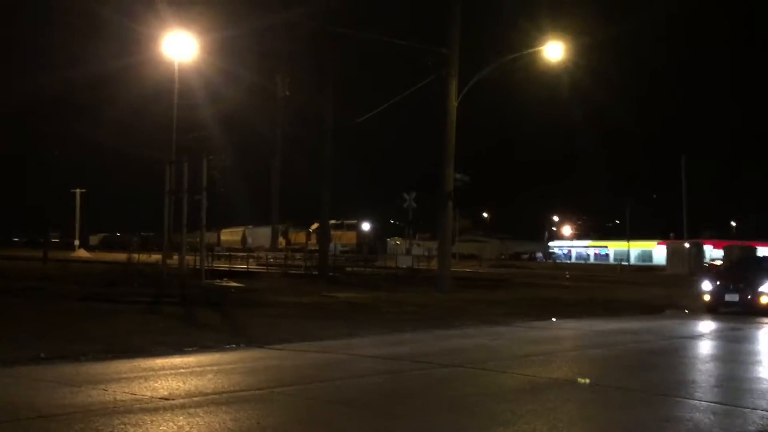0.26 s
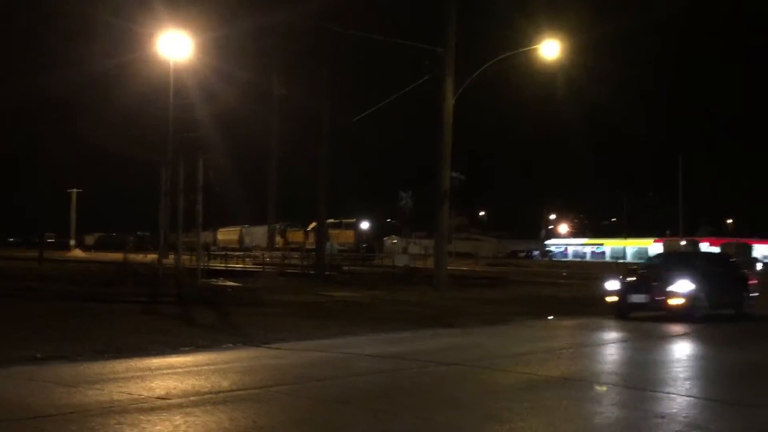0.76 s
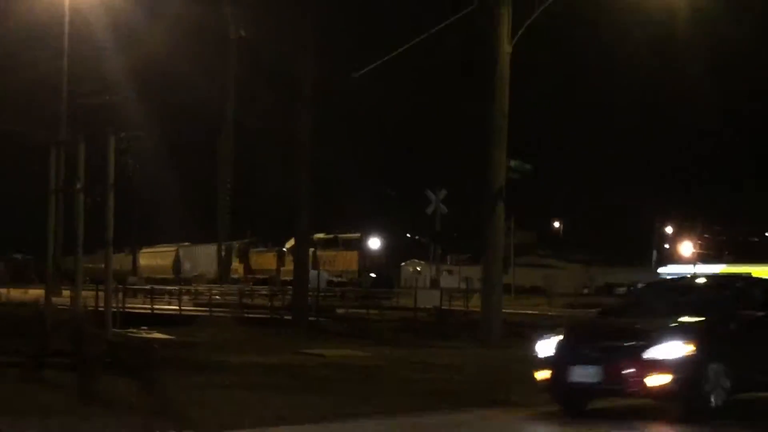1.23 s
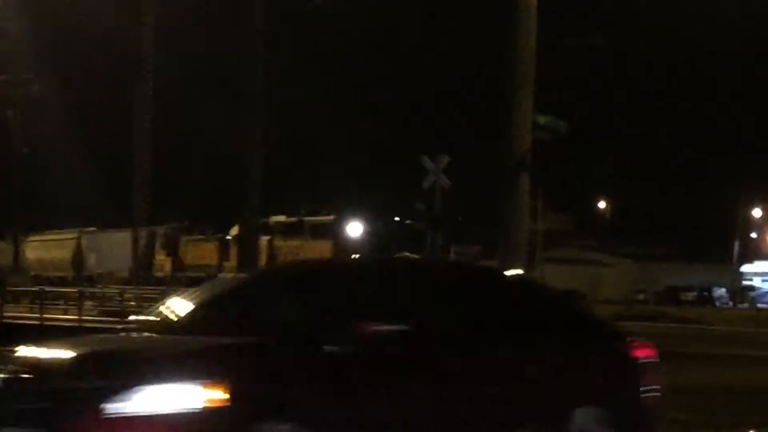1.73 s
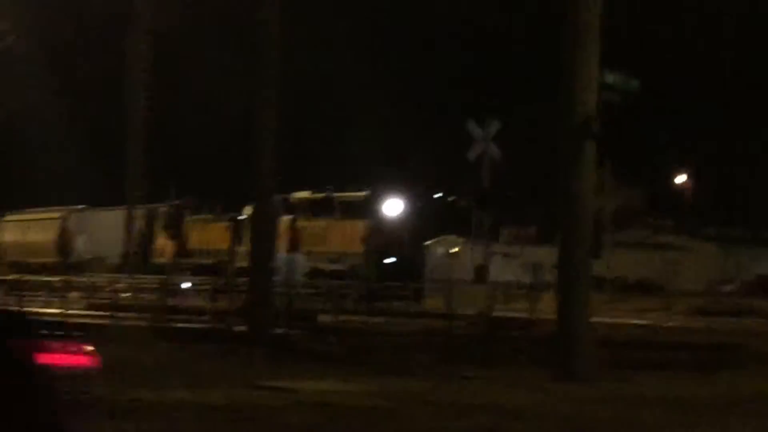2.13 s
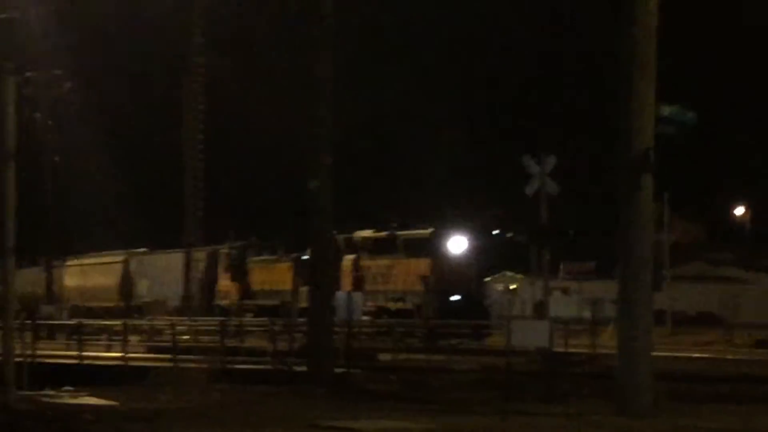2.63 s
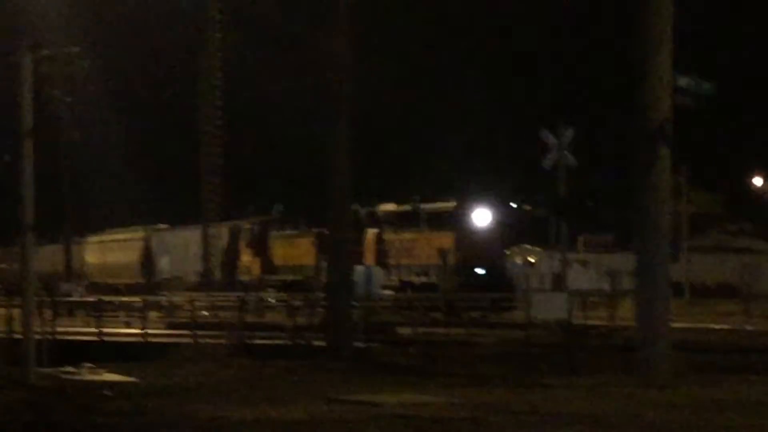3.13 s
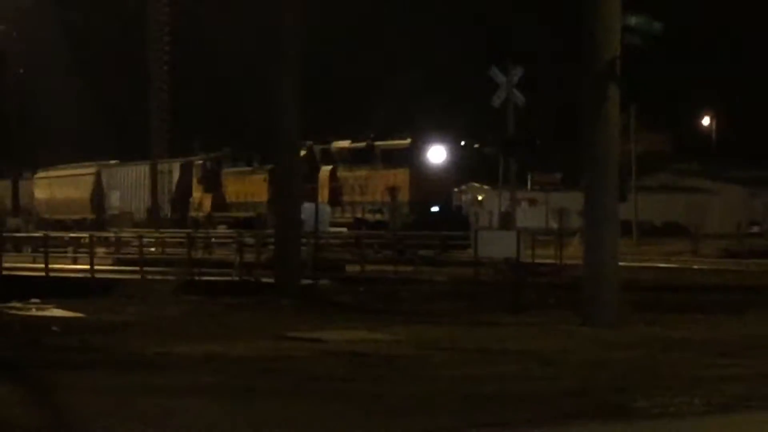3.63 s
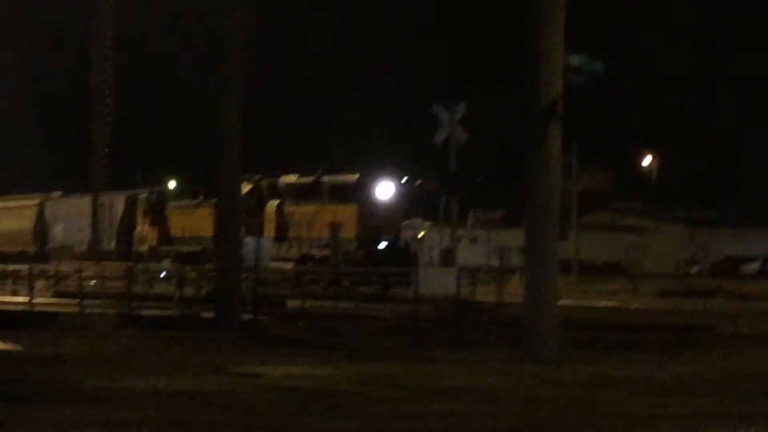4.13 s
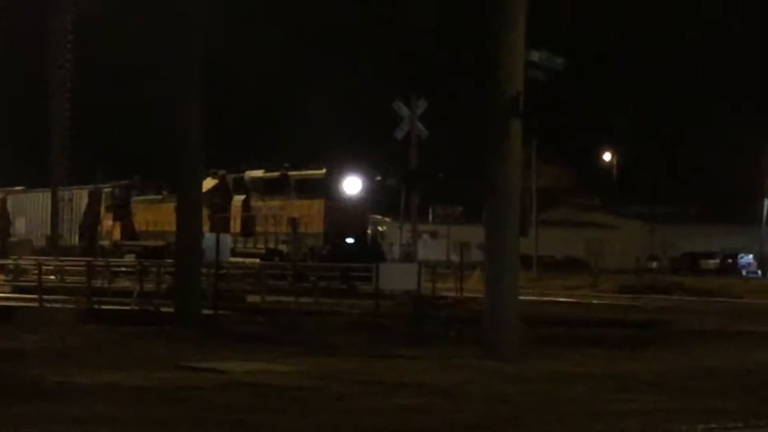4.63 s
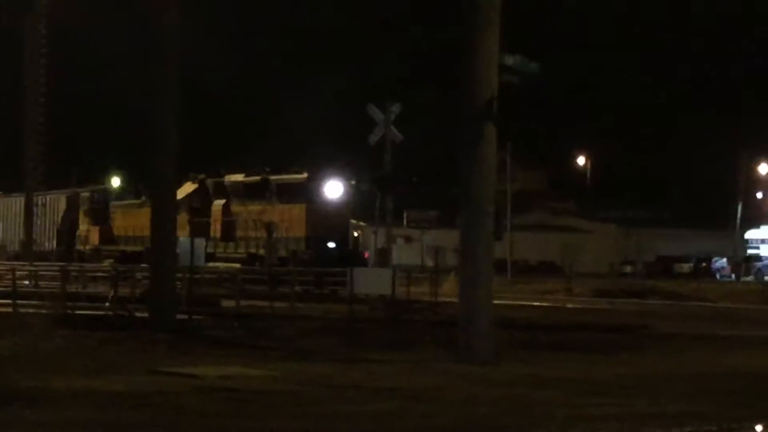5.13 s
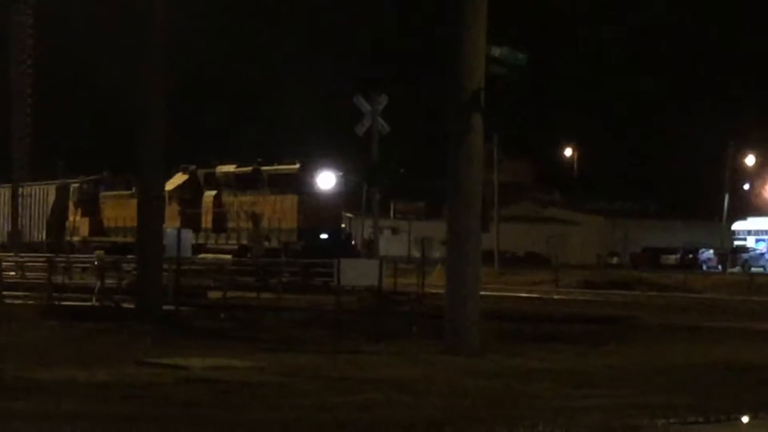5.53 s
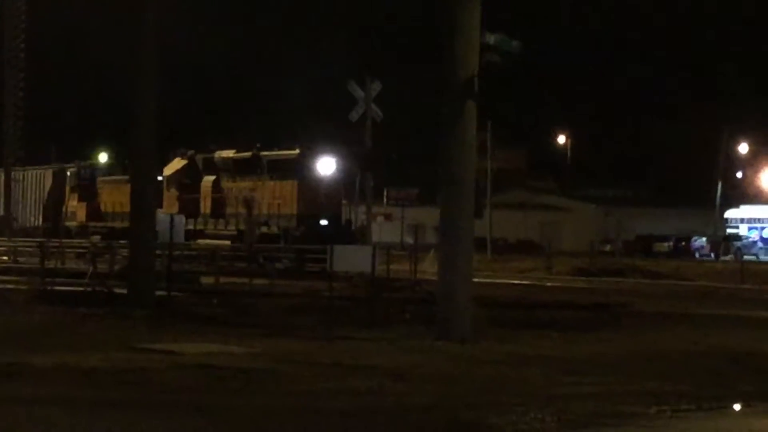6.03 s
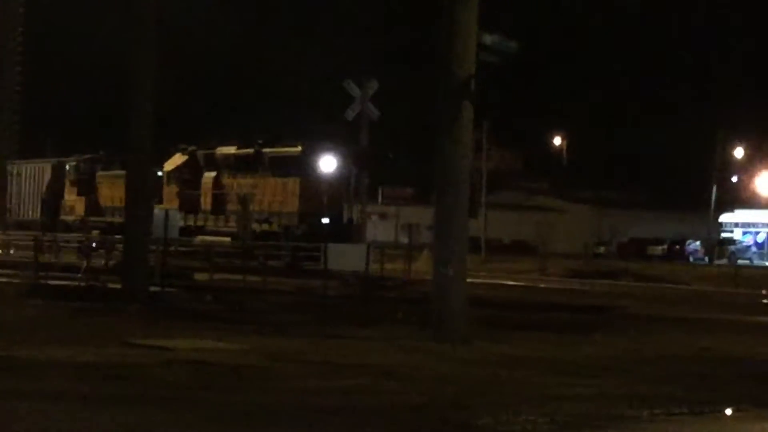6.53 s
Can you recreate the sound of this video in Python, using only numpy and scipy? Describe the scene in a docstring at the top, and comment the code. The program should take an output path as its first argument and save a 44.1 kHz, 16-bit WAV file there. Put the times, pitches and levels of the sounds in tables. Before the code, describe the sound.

A distant diesel locomotive chugs and revs up as a car passes close on a wet road, its tyres knocking over rails.

```python
"""A diesel locomotive throbs across a yard at night and revs up: uneven cylinders chug through the
exhaust stack over rumble and fan roar, while the turbocharger's blades whistle higher and higher.
A car passes close on a wet road. Its tread roars, throws spray and ticks with grit, then the tyres
knock over the rails of the crossing. The car recedes and the engine eases off under a faint hum."""
import sys
import numpy as np
from scipy import signal
from scipy.fft import rfft, irfft, next_fast_len
from scipy.io import wavfile
from scipy.ndimage import uniform_filter1d, map_coordinates

SR = 44100
rng = np.random.default_rng(int(sys.argv[2]) if len(sys.argv) > 2 else 0)


def int16_out(signal):
    """Quantize to a 16-bit WAV file."""
    q = np.round(np.clip(np.atleast_2d(signal).T, -1, 1) * 32767)
    wavfile.write(sys.argv[1], SR, q.astype(np.int16))


N = 298116
TIME = np.arange(N) / SR


def amp(db):
    """Gain of a level in dB."""
    return 10 ** (np.asarray(db) / 20)


def unit(x):
    """x at rms 1."""
    return x / np.sqrt(np.mean(np.abs(x) ** 2) + 1e-20)


def curves(rows):
    """Breakpoints to envelopes: one for each column after the time."""
    times, *columns = np.transpose(rows)
    return [np.interp(TIME, times, column) for column in columns]


def wobble(rate):
    """A smooth random curve, rate knots a second."""
    coarse = TIME[::32]
    knots = rng.standard_normal(int(N * rate / SR) + 4)
    return np.interp(TIME, coarse, map_coordinates(knots, [coarse * rate]))


def filtered(x, response):
    """x through an EQ given as gain against frequency."""
    size = next_fast_len(N + 8192)
    return irfft(rfft(x, size) * response(np.fft.rfftfreq(size, 1 / SR)), size)[..., :N]


def rush(spectrum, patchy_db, source=None, patch=(5, 10)):
    """Coloured noise of rms 1 with random gain in patches of (bins, frames)."""
    cells = signal.stft(rng.standard_normal(N) if source is None else source, nperseg=512)[2]
    field = uniform_filter1d(rng.standard_normal(cells.shape), patch[0], 0)
    field = uniform_filter1d(field, patch[1], 1)
    mottled = signal.istft(cells * amp(patchy_db * unit(field)), nperseg=512)[1][:N]
    eq_hz, eq_db = np.transpose(spectrum)
    return unit(filtered(mottled, lambda hz: amp(np.interp(np.log(hz + 1), np.log(eq_hz), eq_db))))


def fuzzy_tone(hz, width_hz, steady=0, order=2):
    """A band of noise around a held or gliding pitch, plus a steady share of pure tone; rms 1."""
    drift = filtered(rng.standard_normal((2, N)), lambda f: 1 / (1 + (2 * f / width_hz) ** order))
    envelope = steady + unit(drift[0] + 1j * drift[1])
    phase = 2 * np.pi * np.cumsum(np.broadcast_to(hz, N)) / SR
    return unit(np.real(envelope * np.exp(1j * phase)))


def band_burst(count, hz, half_width_hz):
    """A short noise of rms 1 in a band around hz."""
    f = np.fft.rfftfreq(count, 1 / SR)
    return unit(irfft(rfft(rng.standard_normal(count)) / (1 + ((f - hz) / half_width_hz) ** 4), count))


def hum():
    """A faint falling hum creeps in at the end."""
    # the hum's glide: time_s, pitch_hz, level_db
    glide = [(6.4, 583, -79), (6.55, 575, -50), (6.76, 561, -54)]
    hz, level_db = curves([(0, 680, -120)] + glide)
    return amp(level_db) * fuzzy_tone(hz, width_hz=8.1, steady=.9)


def drone():
    """A low, wavering note beside the exhaust that drops back as the car leaves."""
    # the note's course: time_s, pitch_hz, level_db
    course = [(0, 166, -41.5), (.3, 166, -39.5), (.6, 163, -50), (1.3, 162, -45.5), (1.9, 160, -51),
              (2.4, 158, -44.5), (2.95, 162, -45), (3.3, 160, -51), (3.7, 160, -60.5), (6.76, 165, -59.5)]
    hz, level_db = curves(course)
    return amp(level_db) * fuzzy_tone(hz, width_hz=20, steady=.4)


def rumble_and_fans():
    """Low rumble of engine and wagons, and the broad roar of fans and intake."""
    # faders of the two beds: time_s, rumble_db, fan_db
    levels = [(0, -41.5, -46), (1, -37.5, -41.5), (2, -38.5, -51), (2.9, -36.5, -39.5), (3.5, -39, -38),
              (4, -38.5, -39.5), (4.5, -38.5, -39), (5, -38.5, -38.5), (5.5, -40, -39.5), (6.76, -39, -41)]
    # colour of the rumble: frequency_hz, relative_db
    rumble_eq = [(20, -34), (30, -37), (50, 2.5), (70, -2.5), (90, -4.5), (120, -6), (145, -5), (170, -5.5),
                 (200, -6.5), (280, -12), (400, -19), (800, -72.5)]
    # colour of the fans: frequency_hz, relative_db
    fan_eq = [(150, 3.5), (300, -1.5), (450, -2), (600, -1.5), (820, -2), (980, 1), (1080, -0.5),
              (1250, -2.5), (1450, -1.5), (1620, -1.5), (1850, -4), (2200, -6.5), (2400, -15), (2600, -27),
              (3300, -25), (4000, -27.5), (4500, -34.5), (5000, -38.5), (6500, -34), (7500, -60.5),
              (9500, -56), (12000, -53), (16000, -56)]
    rumble_db, fan_db = curves(levels)
    rumble = amp(rumble_db + .15 * wobble(12)) * rush(rumble_eq, patchy_db=.25)
    fans = amp(fan_db + .16 * wobble(13)) * rush(fan_eq, patchy_db=1.58)
    return rumble + fans


def turbocharger():
    """Blade tones glide together; the long path through moving air makes them flutter."""
    # main whistle: time_s, pitch_hz, level_db
    whistle = [(0, 4835, -76), (.4, 5080, -72), (.64, 5230, -70), (.9, 5360, -71), (1.3, 5480, -65),
               (1.55, 5580, -68), (1.84, 5540, -65), (2.2, 5600, -66), (2.38, 5620, -67), (2.52, 5680, -62),
               (2.66, 5705, -55.5), (2.85, 5730, -56.5), (3.05, 5855, -57), (3.27, 5920, -52.5),
               (3.42, 6010, -61), (3.7, 6140, -62), (4.0, 6290, -63), (4.29, 6410, -57.5), (4.5, 6530, -62),
               (5.1, 6778, -59), (5.3, 6845, -59), (5.47, 6862, -56), (5.62, 6830, -61),
               (5.78, 6670, -62.5), (6.05, 6500, -63), (6.33, 6230, -57.5), (6.55, 6080, -66.5),
               (6.76, 5945, -61.5)]
    # other blade tones: ratio_to_whistle, width_hz
    blades = [(.655, 56), (.332, 50), (2, 200)]
    # their faders: time_s, first_db, second_db, third_db
    blade_levels = [(0, -87.5, -75, -105), (2.6, -71, -62, -95), (3.3, -69, -58, -100),
                    (3.8, -69, -56, -99), (4.2, -68.5, -64, -99), (4.4, -76, -55, -98),
                    (4.7, -76, -56.5, -99), (4.85, -67, -57, -96), (5.05, -77, -54.5, -94),
                    (5.4, -75, -61, -91), (5.75, -75, -56.5, -85), (5.92, -75, -59, -83),
                    (6.2, -75, -63, -79), (6.38, -72.5, -60, -89), (6.5, -68, -62, -102),
                    (6.76, -73, -67, -104)]
    hz, whistle_db = curves(whistle)
    out = amp(whistle_db + 1.6 * wobble(30)) * fuzzy_tone(hz, width_hz=92, steady=.45)
    for (ratio, width_hz), level_db in zip(blades, curves(blade_levels)):
        out += amp(level_db + wobble(25)) * fuzzy_tone(ratio * hz, width_hz, steady=.9)
    return out


def exhaust():
    """Uneven cylinders sound multiples of the cycle rate; the lesser ones swell at stack resonances."""
    # engine speed: time_s, cycle_hz
    revs = [(0, 5.55), (.5, 5.854), (1, 6.069), (1.5, 6.208), (2.5, 6.265), (3, 6.401), (3.5, 6.596),
            (5.5, 7.59), (6, 7.5), (6.4, 7.2), (6.76, 7.03)]
    # two leading harmonics: time_s, order_24_db, order_9_db
    lead_levels = [(0, -47.5, -54), (.6, -42, -48), (1.5, -50, -50), (2.0, -59, -52), (2.4, -48, -46),
                   (2.7, -48, -46), (3.1, -38, -50), (3.4, -41, -49), (3.7, -37, -54.5), (4.1, -38, -51.5),
                   (4.55, -37.5, -50), (4.9, -47, -50), (5.6, -60, -60), (6.76, -63, -57)]
    # lesser harmonics: multiple_of_cycle_rate
    orders = [7, 8, 10, 12, 13, 15, 16, 17, 18, 20, 21, 22, 23, 25, 26, 27, 28, 29, 30, 32]
    # their strength before the stack: level_db
    order_levels = [-55, -53.5, -54, -56.5, -53.5, -45.5, -46.5, -47, -48.5, -59.5, -53.5, -52.5, -56.5,
                    -55, -51.5, -48.5, -57.5, -46.5, -48, -43]
    # what the exhaust stack passes: frequency_hz, gain_db
    stack = [(38, -18.5), (53, -1), (65, -6), (92, -11.5), (125, -1.5), (155, 1), (185, -9), (240, -15)]
    cycle_hz, = curves(revs)
    main_db, low_db = curves(lead_levels)
    stack_hz, stack_db = np.transpose(stack)
    phase = 2 * np.pi * (np.cumsum(cycle_hz) / SR - .83)  # first chug falls .83 of a cycle in
    out = amp(main_db + .6 * wobble(5)) * np.sin(24 * phase) + amp(low_db) * np.sin(9 * phase)
    for order, db in zip(orders, order_levels):
        level_db = db + np.interp(order * cycle_hz, stack_hz, stack_db) + 1.4 * wobble(2.51)
        offset = rng.normal(0, 1.25)  # loosely in step: the sum chugs once a cycle
        out += amp(level_db) * np.sin(order * phase + offset)
    return np.sqrt(2) * out


def passing(part):
    """Level in dB of a part of the car's sound, peaking as that part faces the listener."""
    # pass-by of each part: peak_s, peak_db, coming_s, going_s, loss_db_per_decade of distance
    parts = { "roar": (2.0, -35.5, 1.16, 0.83, 32), "upper song": (1.06, -40, 0.5, 0.63, 42),
             "groove song": (2, -37.5, 0.67, 1.14, 55), "side band": (2.0, -42.5, .5, 0.46, 54),
             "deck": (3, -46, 0.5, .5, 47), "spray": (1.93, -56, .5, 1.8, 39.5),
             "bright spray": (2, -62, 0.46, 0.28, 45), "sizzle": (2.5, -60, .5, .5, 46), }
    peak_s, peak_db, coming_s, going_s, loss_db = parts[part]
    along = (TIME - peak_s) / np.where(TIME < peak_s, coming_s, going_s)
    return peak_db - loss_db * np.log10(np.hypot(1, along))


def wetness():
    """Level in dB of the spray outside puddles; it dies as the car leaves the wet stretch."""
    dry_s, fall_db_per_s = 3.28, 73
    return passing("spray") - fall_db_per_s * np.maximum(TIME - dry_s, 0)


def spray():
    """The tread throws clumps of uneven drops, thicker in puddles; a bright band crests as it passes."""
    # spray from puddles: start_s, rise_s, level_db, hold_s
    puddles = [(1.403, 0.44, -61, .3), (2.168, 0.09, -50.5, 0.056), (2.725, .01, -55, .38)]
    # colour of the drops: frequency_hz, relative_db
    water_eq = [(2000, -5), (3500, 3.5), (4700, -4.5), (6200, -3.5), (7500, -5.5), (9000, -4.5),
                (10300, -11), (12000, -9), (15800, -14.5)]
    sag_db_per_s, drain_db_per_s = 5.8, 130
    power = amp(wetness()) ** 2
    for start_s, rise_s, db, hold_s in puddles:
        age = TIME - start_s
        level_db = db - sag_db_per_s * age - drain_db_per_s * np.maximum(age - rise_s - hold_s, 0)
        power += np.clip(age / rise_s, 0, 1) * amp(level_db) ** 2
    size_db = np.minimum(2.5 * rng.exponential(size=N), 21)
    drops = rng.standard_normal(N) * amp(size_db + wobble(50) + .98 * wobble(9))
    bright = amp(passing("bright spray") + 1.5 * wobble(25)) * fuzzy_tone(9200, width_hz=2000, order=4)
    return bright + np.sqrt(power) * rush(water_eq, patchy_db=2.5, source=drops, patch=(30, 4))


def grit_and_splashes():
    """Each tick or splash is a dying burst of treble noise; finer grit falls at random."""
    # single splashes: start_s, level_db, t60_s
    splashes = [(2.52, -52, .03), (2.729, -54, .1), (2.781, -48.5, .06), (2.829, -48, .066),
                (2.9, -56, .05), (2.95, -53.5, .06), (2.984, -47.5, 0.041), (3.04, -55.5, 0.064),
                (3.09, -62, .035), (3.181, -54, 0.11), (3.254, -59, 0.03), (3.29, -62, 0.037),
                (3.339, -63, 0.037)]
    # ticks of coarse grit: start_s, level_db, centre_hz
    ticks = [(.216, -65, 7950), (.292, -54, 6000), (.368, -53, 6460), (.463, -59, 7300), (.487, -62, 12400),
             (.928, -48, 7600), (.955, -49, 7500), (1.184, -53, 7460), (1.186, -49, 4830),
             (1.239, -52, 4000), (1.36, -59, 8000), (1.455, -50, 6800), (1.535, -55, 7990),
             (1.695, -50.5, 8000), (1.75, -52, 4500), (1.778, -43, 3500), (1.786, -46, 11400),
             (2.4975, -43, 3500), (3.105, -52, 8000), (3.145, -54, 7990), (3.254, -41, 3200),
             (3.552, -46, 2000), (3.755, -46, 3120)]
    tick_t60_s, tick_spread, fine_per_s = .019, .33, 70  # spread: half width over centre
    out, t = np.zeros(N + SR), np.arange(4096) / SR
    wet_db = wetness()
    bursts = [(start_s, db, 8000, 6500, t60_s) for start_s, db, t60_s in splashes]
    bursts += [(start_s, db, hz, tick_spread * hz, tick_t60_s) for start_s, db, hz in ticks]
    # fine grit rides on the spray level: 100 chances a second for 4 s
    for start_s, chance, strength, octave in rng.random((400, 4)) * [4, 100, 1, 1]:
        if chance < fine_per_s:
            db = wet_db[int(start_s * SR)] - 3 + 7 * strength
            hz = 8000 * 2 ** (octave - .5)
            bursts.append((start_s, db, hz, 2 * tick_spread * hz, tick_t60_s / 2))
    for start_s, db, hz, half_width_hz, t60_s in bursts:
        envelope = amp(db - 60 * t / t60_s) * (1 - np.exp(-t / .00068))
        out[round(start_s * SR):][:len(t)] += envelope * band_burst(len(t), hz, half_width_hz)
    return out[:N]


def sinking(coming_hz, going_hz, middle_s, half_length_s):
    """A pitch that slides from its coming to its going value."""
    slide = np.tanh((TIME - middle_s) / half_length_s)
    return (coming_hz + going_hz) / 2 - (coming_hz - going_hz) / 2 * slide


def tyre_roar():
    """Tread noise, two sinking groove resonances, a side band, sizzle and the drumming crossing deck."""
    upper_hz = sinking(1616, 1330, middle_s=.93, half_length_s=.35)
    groove_hz = sinking(1005.4, 929, middle_s=2.1, half_length_s=.4)
    upper = amp(passing("upper song") + .49 * wobble(11)) * fuzzy_tone(upper_hz, width_hz=530)
    groove = amp(passing("groove song") + 1.4 * wobble(15)) * fuzzy_tone(groove_hz, width_hz=230)
    side = amp(passing("side band") + .69 * wobble(13)) * fuzzy_tone(2000, width_hz=440)
    sizzle = amp(passing("sizzle") + 1.7 * wobble(30)) * fuzzy_tone(3800, width_hz=1700, order=4)
    deck = amp(passing("deck") + 2.2 * wobble(20)) * fuzzy_tone(400, width_hz=220)
    # colour of the tread noise: frequency_hz, relative_db
    tread_eq = [(150, -9.5), (250, -6.5), (500, -6), (800, -5), (1000, 0.5), (1500, -2.5), (2100, -7.5),
                (2800, -15.5), (4000, -32), (6000, -38), (9000, -55)]
    tread = amp(passing("roar") + .51 * wobble(8.3)) * rush(tread_eq, patchy_db=2)
    return tread + upper + groove + side + sizzle + deck


def rail_knocks():
    """Each blow rings the tyre briefly, rattles it and thumps the body; ground and walls answer."""
    # tyres on joints and rails: start_s, ring_db, ring_hz, thump_db, contact_s
    blows = [(1.244, -26, 1170, -43, 0.0065), (1.302, -26, 1060, -51, .002),
             (1.328, -25.5, 1500, -45, 0.0027), (1.769, -20.5, 960, -30, 0.0058),
             (2.012, -32, 706, -38, 0.0032), (2.314, -24, 983, -35, 0.0032), (2.325, -26, 895, -34, 0.0023),
             (2.4974, -24.5, 1070, -26, 0.00097), (2.5813, -18.5, 890, -24.5, 0.0064),
             (2.654, -22.5, 930, -23, 0.016), (2.714, -27, 896, -33, .006), (2.8, -17, 850, -31, 0.0034),
             (2.814, -28, 895, -40, 0.0022), (2.9012, -23, 1128, -30, 0.0036),
             (2.926, -24, 708, -18, 0.0076), (2.9845, -19, 1160, -42, 0.0023),
             (2.995, -26, 1130, -42, 0.0043), (3.139, -21, 704, -18.5, 0.0066),
             (3.301, -29.5, 1017, -26, .007), (3.315, -33, 1010, -30, 0.0033),
             (3.433, -28.5, 690, -31, 0.0044), (3.634, -33, 745, -43, 0.0023),
             (3.7547, -28, 1080, -31, 0.0021)]
    # modes of the car's body: pitch_hz, relative_db, t60_s
    body_modes = [(252, -0.5, 0.076), (165.5, -1, .09)]
    ring_t60_s, damping_t60_s = .07, .022  # the damping adds to the decay once contact ends
    out, t = np.zeros(N + SR), np.arange(4096) / SR
    for start_s, ring_db, hz, thump_db, contact_s in blows:
        ring = -np.sin(2 * np.pi * hz * t) + .22 * band_burst(len(t), hz, half_width_hz=400)
        ring *= amp(-60 * t / ring_t60_s - 60 * np.maximum(t - contact_s, 0) / damping_t60_s)
        ring *= 1 - np.exp(-t / .0005)
        crack = .39 * amp(-60 * t / .013) * band_burst(len(t), 1.58 * hz, half_width_hz=660)
        body = sum(amp(db - 60 * t / t60_s) * np.sin(2 * np.pi * mode_hz * rng.uniform(.89, 1.05) * t)
                   for mode_hz, db, t60_s in body_modes)
        body += .48 * amp(-60 * t / .064) * band_burst(len(t), 400, half_width_hz=130)
        thump = amp(thump_db - 3) * body * (1 - np.exp(-t / .0033))
        out[round(start_s * SR):][:len(t)] += amp(ring_db) * (ring + crack) + thump
    tail = rng.standard_normal(len(t)) * amp(-60 * t / .043)
    delayed = np.pad(out, (300, 0))  # about 7 ms of pre-delay
    echoes = amp(-12) * signal.fftconvolve(delayed, tail / np.linalg.norm(tail))
    # rubber contact has no treble
    return filtered(out[:N] + echoes[:N], lambda hz: 1 / (1 + (hz / 3000) ** 6))


def scene():
    """Locomotive far, car near, in mono."""
    far = exhaust() + rumble_and_fans() + turbocharger() + hum() + drone()
    near = tyre_roar() + spray() + grit_and_splashes() + rail_knocks()
    return (far + near)[None]


def record(dry):
    """The microphone drops the deepest bass and all above its band limit; the end fades quickly."""
    low_cut_hz, top_hz, fade_s = 33, 15800, .008
    fade = np.sin(np.pi / 2 * np.clip(TIME[::-1] / fade_s, 0, 1))
    return filtered(dry * fade, lambda hz: (hz < top_hz) * hz ** 4 / (hz ** 4 + low_cut_hz ** 4))


dry = scene()
out = record(dry)
int16_out(out)
```